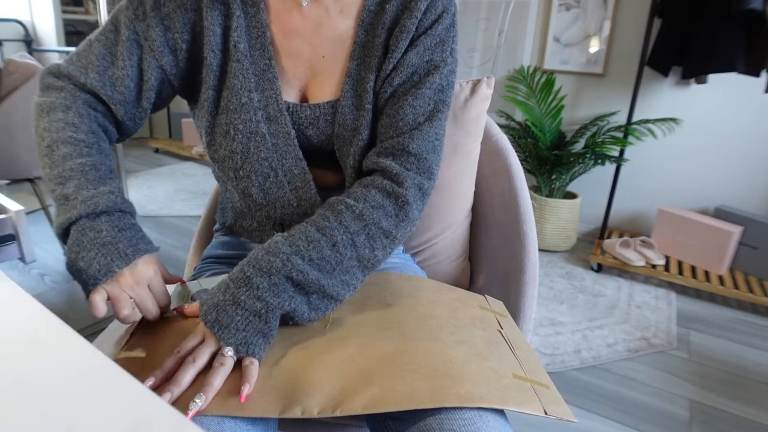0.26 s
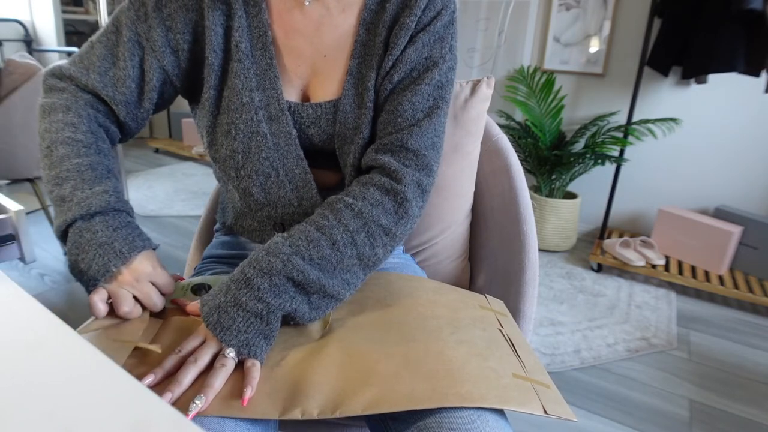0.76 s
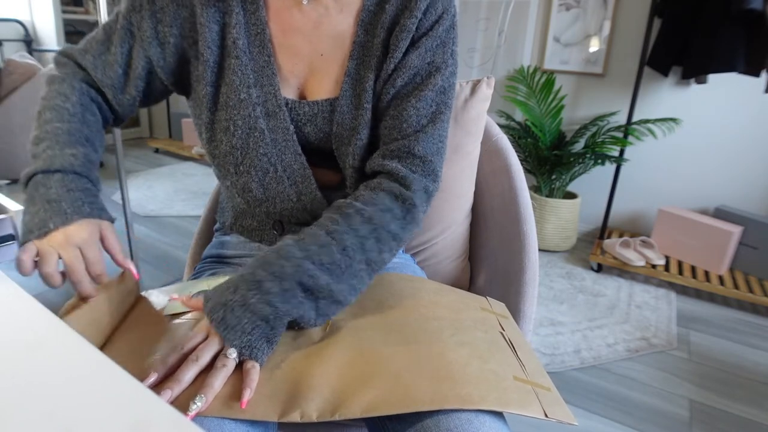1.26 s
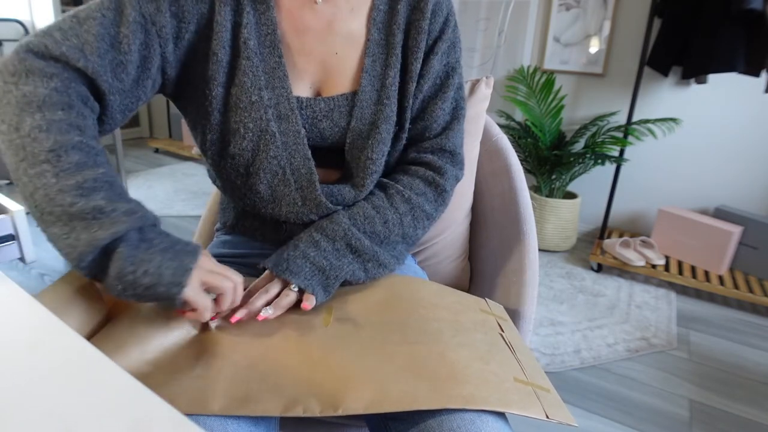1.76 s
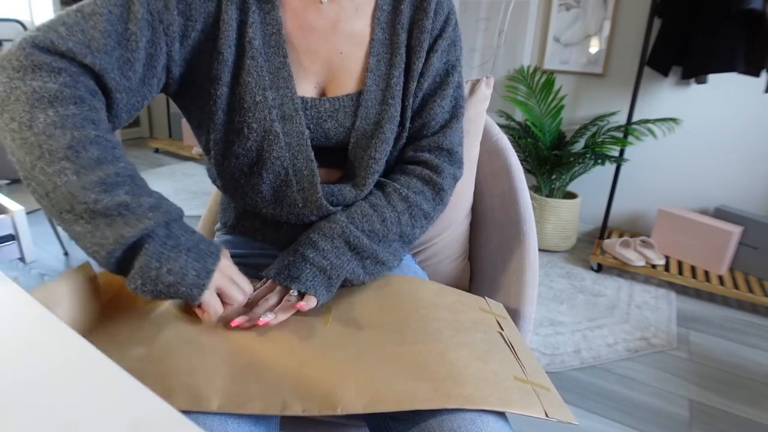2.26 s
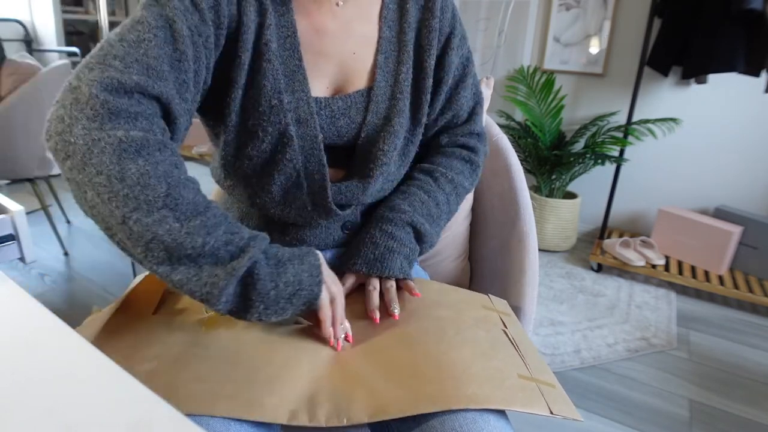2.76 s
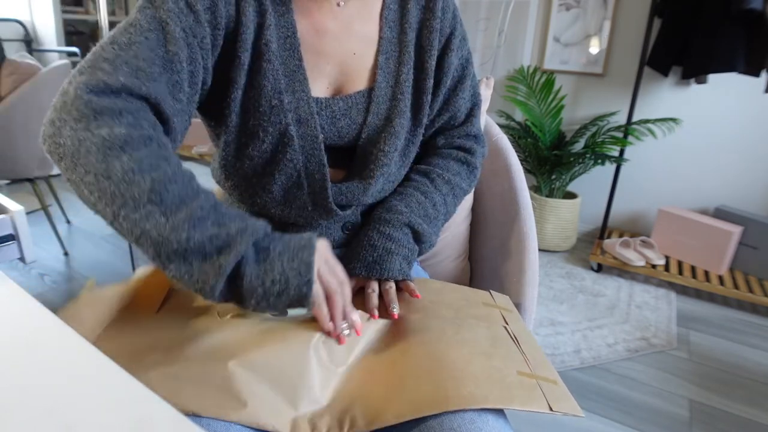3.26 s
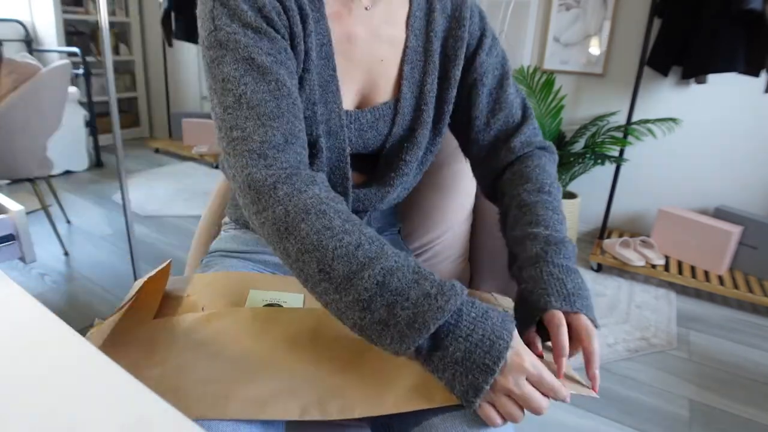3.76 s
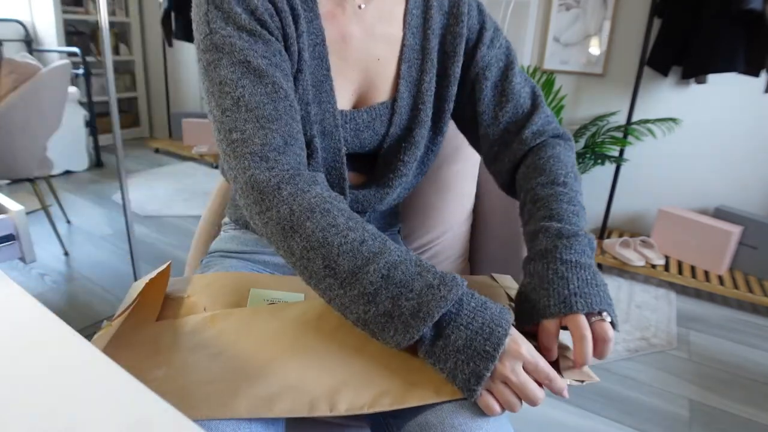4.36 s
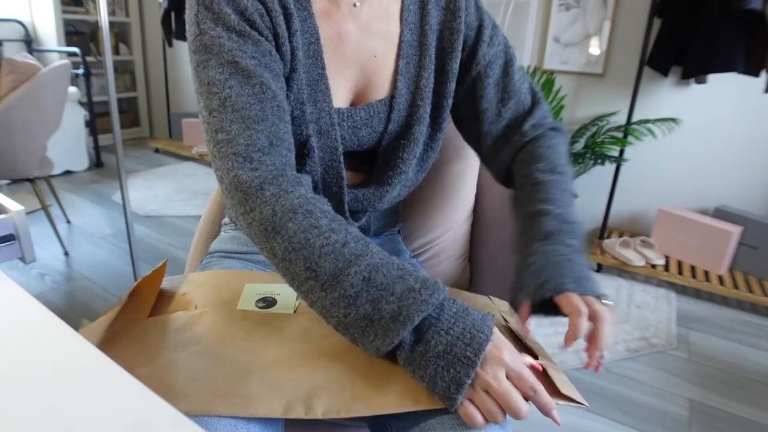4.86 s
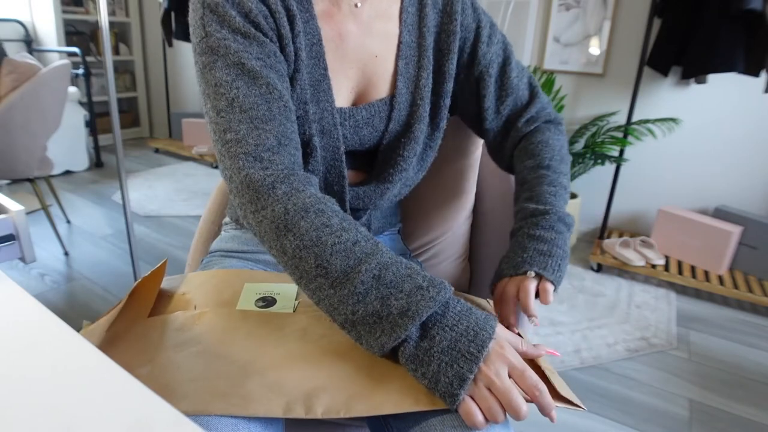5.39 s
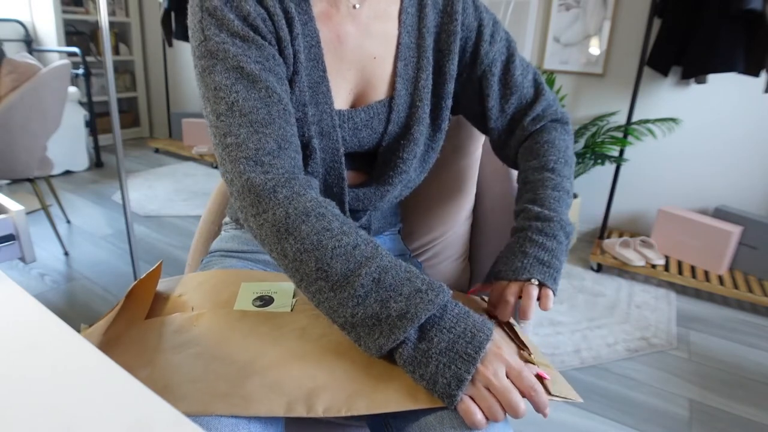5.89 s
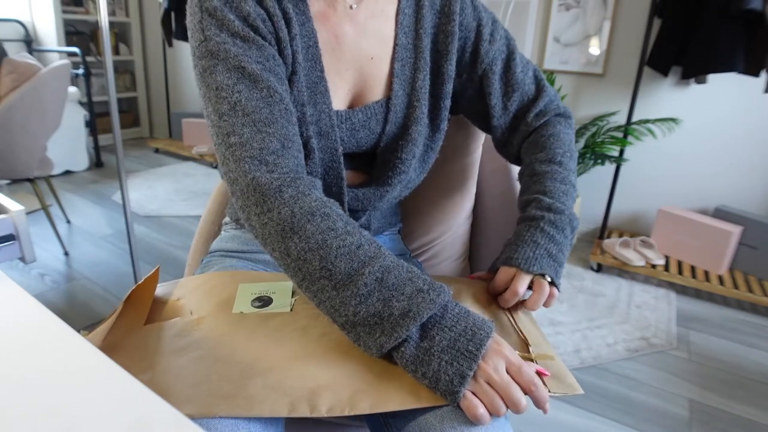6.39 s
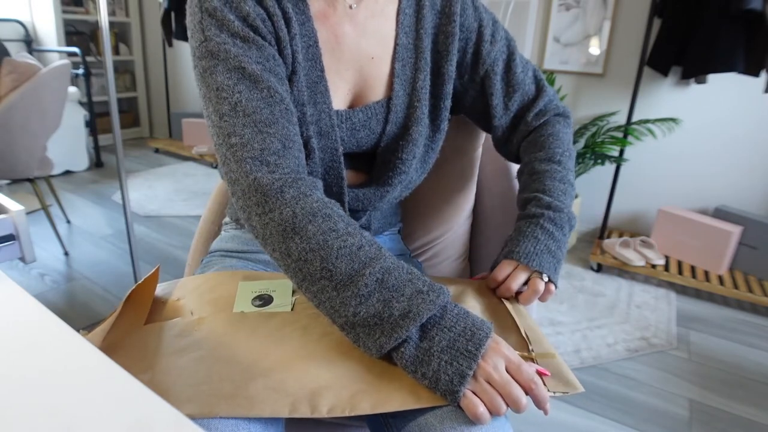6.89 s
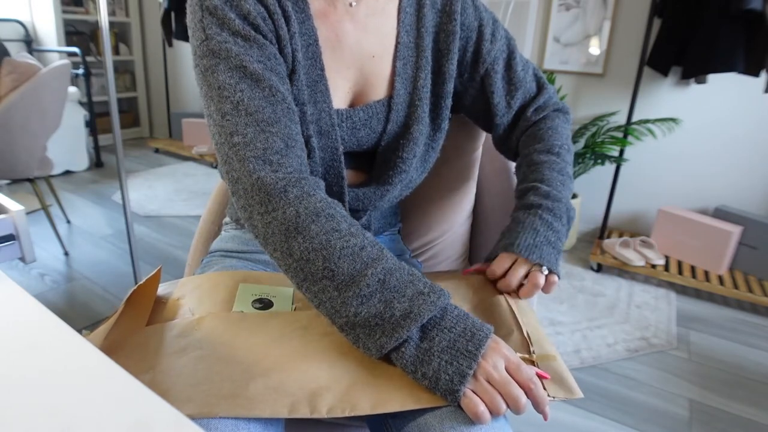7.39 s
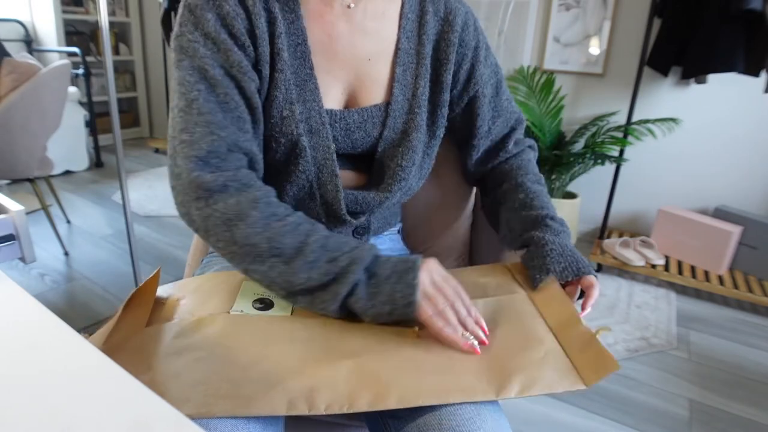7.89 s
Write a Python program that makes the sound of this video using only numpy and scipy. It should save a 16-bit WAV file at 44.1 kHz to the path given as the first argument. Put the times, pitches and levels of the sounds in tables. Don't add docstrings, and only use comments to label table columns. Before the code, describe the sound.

Close stereo sound of hands working a large, stiff kraft paper mailer in a living room. From 0 s light crinkles and small snaps grow, with soft low air puffs near 0.8 to 1.1 s and loud sharp creases and rips around 0.95 and 1.1 s. After a brief lull, scattered hard snaps continue from 1.3 s, becoming dense pinching crackle at 2 to 2.4 s and again until 3.6 s, with a soft puff at 3.2 s. At 3.7 s the room tail cuts abruptly. Quieter tab handling follows, with a strong rip at 4.6 s, then near quiet from 4.85 to 5.4 s. Seam crackles resume around 5.7 s, with a rip at 6.7 s. Busy, bright snapping peaks at 7.3 to 7.6 s, pauses, then crackles and rips from 7.85 s to the end. Short wall reflections and a faint steady hum remain underneath.

```python
import sys
import numpy as np
from scipy import signal
from scipy.fft import rfft, irfft, next_fast_len
from scipy.io import wavfile
from scipy.ndimage import uniform_filter1d, map_coordinates

SR = 44100
rng = np.random.default_rng(int(sys.argv[2]) if len(sys.argv) > 2 else 0)


def gain_from_db(level_db):
    decades = np.asarray(level_db, float) / 20
    return 10 ** decades


def generate_wav(sig):
    pcm = np.round(np.clip(np.atleast_2d(sig).T, -1, 1) * 32767).astype(np.int16)
    wavfile.write(sys.argv[1], SR, pcm)


N = 358753

# start_s, peak_db, low_part_db, high_part_db, flat_ring_hz
SNAPS = [(0.1088, -47, -21, 4, 5280), (0.1811, -21.5, -2, -10, 1720), (0.2537, -32, 2, -16, 1660),
         (0.2806, -36, -1, -14, 1420), (0.2988, -33, -5, -13, 3230), (0.3045, -29.5, 5, -3, 2220),
         (0.3092, -21, -14, -11, 3060), (0.3295, -23, -7, -9, 2050), (0.3481, -29, -12, -11, 3190),
         (0.3781, -25.5, 0, -10, 1880), (0.3844, -19.5, -26, -8, 1920), (0.4198, -25, -6, 6, 4800),
         (0.4744, -27, 3, -11, 970), (0.5288, -40, -14, -5, 2050), (0.5586, -44, -4, -10, 1790),
         (0.5785, -31, 6, -18, 1820), (0.5878, -25, -5, -22, 1680), (0.6654, -38, -11, -5, 2930),
         (0.6756, -36, 2, 2, 1700), (0.7366, -24, -4, -15, 1780), (0.7536, -21, -7, -9, 5000),
         (0.7807, -18.5, -16, 5.5, 4560), (0.8385, -14.5, 4.5, -6, 1260), (0.8833, -28, -21, -8, 1720),
         (0.9526, -11, -21, 0, 1750), (0.9581, -7, -15, -13, 2400), (1.0585, -21, 3, -2, 2000),
         (1.0679, -26, -9, -5, 2350), (1.0765, -23, -8, 13, 2200), (1.3033, -36.5, 13.5, -8, 1310),
         (1.3249, -24.5, -12, -11, 2330), (1.3741, -9.5, -9, -8, 4470), (1.4917, -25, -6, -17, 1780),
         (1.4985, -10.5, -19, -26, 1850), (1.5853, -10.5, -6, -7, 1320), (1.6185, -15, -6, -14, 1640),
         (1.7608, -23, -11, -24, 1760),
         (1.842, -21, -15, -3, 1540), (1.944, -42, -17, 1, 5900), (1.9532, -30, -2, -14, 1830),
               (1.9753, -33, -8, -13, 2070), (2.0335, -18, -29, -8, 3400), (2.0778, -13, -10, -14, 1440),
               (2.1183, -12.5, -19, -18, 3670), (2.1265, -7.5, -40, -22, 3420),
               (2.1471, -10, -38, -7, 4030), (2.1997, -9, -15, -22, 2550), (2.2263, -10.5, -19, -18, 3340),
               (2.244, -13, -25, -12, 3080), (2.313, -7.5, -8, -18, 1820), (2.5174, -22, -7, -9, 1760),
               (2.534, -7, -25, -11, 4200), (2.6322, -32, 9, -15, 2040), (2.6941, -16, -25, 9, 4700),
               (2.778, -35, 4.5, -5, 1630), (2.8233, -10, -27, -9, 4050), (2.8468, -20, -25, 10.5, 6700),
               (2.8607, -23, -15, 1, 4310), (2.8655, -30, -27, 6, 4610), (2.9099, -18.5, -15, -6, 2940),
               (2.9249, -20.5, -22, -21, 2240), (2.9648, -24.5, -20, -21, 6000),
               (2.9846, -9.5, -11, -3, 5500), (3.117, -22, 2.5, -9, 2660), (3.1445, -29, -6, -25, 1850),
               (3.166, -30, -24, 0, 4760), (3.175, -4.5, -23, -3, 4730), (3.2386, -17, 4.5, -16, 3940),
               (3.28, -12.5, -12, -6, 3580), (3.2996, -16, -19, -10, 1700), (3.307, -17, -1, -16, 2100),
               (3.3324, -14.5, -5, -32, 1700), (3.3885, -21, 2, -19, 1800), (3.393, -26, 1, -23, 1750),
         (3.4346, -23.5, 8, -8, 1380), (3.464, -12, -6, 5.5, 5570), (3.4804, -10.5, -7, 0, 2700),
             (3.4904, -17, -12, 7, 2500), (3.512, -12.5, -6, -6, 2650), (3.531, -26, 3, -11, 1920),
             (3.5555, -6.5, -4, -6, 4430), (3.725, -30, -3, -8, 1430), (3.8573, -39, -10, -8, 1980),
             (3.93, -45, -15, -11, 2480), (3.9796, -18.5, -19, -5, 3720), (4.0637, -49, -16, -8, 2170),
             (4.068, -16, -14, -28, 2620), (4.0805, -9.5, -30, -26, 4430), (4.1004, -14, -28, 2, 3400),
             (4.22, -29.5, -13, 3, 2990), (4.241, -16.5, -14, -7, 2000), (4.2776, -29, -7, -6, 1650),
             (4.309, -19, -13, -13, 4250), (4.419, -26.5, 2, -15, 880), (4.4309, -14, -7, -24, 2400),
             (4.4434, -20, -2, -17, 2400), (4.4567, -26, -17, -13, 1720), (4.5517, -15, -9, -18, 2400),
             (4.581, -8, -15, -2.5, 4080), (4.727, -21.5, -11, -8, 1670), (4.833, -26, -11, -32, 4350),
             (5.1357, -37, -27, -10, 4870), (5.2222, -36, -14, -8, 1740), (5.26, -30, -18, -13, 2370),
             (5.265, -36, -8, -8, 2260), (5.275, -21.5, -25, -11, 2100), (5.458, -20.5, -12, -0.5, 850),
             (5.5035, -25.5, -15, -16, 1920), (5.549, -39, -25, -16, 3400), (5.5894, -36, -12, -12, 3770),
             (5.5951, -17, -7, -4, 905),
         (5.663, -10.5, -17, -9.5, 4750), (5.6688, -29, -21, -12, 4740), (5.7347, -18, -13, -19, 3200),
              (5.7714, -20, -8, -19, 4030), (5.7891, -20.5, -18, -8, 5000), (5.8027, -31, 4, 3, 2820),
              (5.8394, -21, -14, -19, 3700), (5.88, -18, -7, 2.5, 1660), (5.9284, -17, -15, -15, 4300),
              (5.9388, -20, -24, -15, 2060), (5.9895, -26, 5, -18, 4130), (6.0138, -12.5, -35, -2.5, 2200),
              (6.031, -19, -7, -5, 4110), (6.037, -10.5, -15, -5, 1550), (6.0912, -19.5, -24, -15, 2900),
              (6.1206, -8, -20, -6, 2030), (6.128, -13.5, -19, -0.5, 2110), (6.156, -11, -9, -31, 1620),
              (6.2385, -28, 4, -16, 1390), (6.251, -13.5, -17, -16, 2230), (6.351, -32, -5, -7, 1850),
              (6.3859, -21.5, -3, -14, 2140), (6.4092, -27.5, -4, 0, 1080), (6.458, -24.5, -9, -23, 1650),
              (6.495, -23, 1, -21, 1400), (6.5352, -21, -3, -12, 1610), (6.5552, -22, -1, -7, 3770),
              (6.5926, -12.5, -7, 2, 2200), (6.653, -20, -10, -11, 1480), (6.6877, -15, -12, -25, 3200),
              (6.7269, -7, -10, -3, 4220), (6.8517, -26, -20, -22, 1770), (6.8602, -23.5, -16, -24, 1590),
              (6.891, -20.5, -2.5, -32, 2180), (6.906, -24.5, -12, -17, 2380), (6.937, -38, -19, -10, 2800),
              (6.9518, -28, -5, -22, 1650),
         (6.9586, -24.5, -14, -27, 1970), (6.9842, -19.5, -3.5, -25, 2520),
               (6.99, -15, -21, -15, 2740), (7.0127, -13.5, -4, -9, 2750), (7.0341, -16.5, -15, -9, 1680),
               (7.0432, -15, -11, -9, 3230), (7.0758, -19.5, 1, -11, 2160), (7.0894, -8, -18, -3.5, 2900),
               (7.1296, -26, -12, -7, 2260), (7.1366, -11.5, -27, -7, 2630), (7.1578, -21, -28, -18, 3480),
               (7.2355, -39, 1, -13, 1830), (7.2576, -48, -6, -25, 1300), (7.2801, -45, -4, -13, 1540),
               (7.3125, -15.5, 4, -11, 2300), (7.3192, -13, -6, -15, 1950), (7.3346, -6.5, -7.5, -30, 3400),
               (7.3528, -22, -2, -14, 2300), (7.4107, -17, -20, -20, 4480), (7.4257, -20, 4.5, -23, 1350),
               (7.446, -10.5, -12, -6, 3420), (7.4833, -10.5, -2, -30, 1730), (7.5146, -28, -12, 12, 3620),
               (7.5223, -17, -17, -9, 1540), (7.5413, -8, -11, -6, 3460), (7.558, -3.5, -17, -19, 1570),
               (7.5675, -8, -13, -25, 1870), (7.8613, -25, 0.5, -4, 1600), (7.8701, -18.5, -6, -2, 6200),
               (7.9483, -9, -38, -8, 3870), (7.975, -26, -21, -7, 4520), (8.001, -18, -26, -10, 2370),
               (8.0146, -19.5, -11, -13, 1330), (8.0372, -11, -4, -21, 2040), (8.0556, -19, 9.5, -12, 2220),
               (8.063, -8.5, -15, -18, 1920), (8.0883, -16.5, -20, 5, 4340),
         (1.1057, -7, -15, -1, 3140),
    (4.5927, -11, -17, -7, 4110),
    (6.6969, -14, -3.5, -22, 2300),
    (7.5767, -7, -7, -7, 2300),
    (8.0701, -7, -11, -4, 2600),
]
# start_s, peak_db, low_part_db, high_part_db, length_ms
RIPS = [(0.0004, -24.5, -13, 0, 17), (0.9519, -12.5, -8.5, -6.5, 26), (1.099, -13, -3, -5, 20),
        (2.2408, -7.5, -48, -16, 42), (3.1722, -17.5, -6, -38, 49), (3.5538, -11, -18, -13, 15),
        (3.701, -26, -1, -6, 3), (4.549, -18.5, 3.5, -39, 31), (4.58, -15, -17, -5, 60),
        (5.22, -33.5, -21, -15, 6), (6.721, -18.5, -10, 2, 24), (7.5569, -10.5, -26, -56, 45),
        (7.601, -11.5, -24, -19, 50), (8.0606, -10, -30, -25, 11)]
# start_s, hold_s, crinkle_db, boom_db (over the
# crinkle), brightness_db
SPELLS = [(-0.004, 0.23, -49.5, -5, 20), (0.292, 0.15, -39.5, -9, 10.5),
          (0.47, 0.23, -41.5, -29, 8), (0.74, 0.16, -38, -11.5, 10.5),
          (0.959, 0.064, -27, -10.5, 12), (1.072, 0.044, -24.5, -6.5, 14.5),
          (1.206, 0.19, -41, -5, 10), (1.374, 0.062, -38, -26, 15.5), (1.476, 0.37, -39, -30, 3),
          (1.596, 0.071, -34.5, -13, 15.5), (1.716, 0.12, -33.5, -20, 3.5),
          (1.995, 0.057, -34.5, -35, 14), (2.115, 0.14, -44.5, -12, 27),
          (2.236, 0.079, -27.5, -9.5, 14), (2.363, 0.025, -23, -17.5, 3),
          (2.448, 0.06, -28.5, -15.5, 1), (2.532, 0.019, -35.5, -5, 17.5),
          (2.606, 0.17, -42, -10, 11), (2.69, 0.26, -46, -25, 16.5), (3, 0.065, -38.5, -16, -8),
          (3.187, 0.056, -24, -12.5, 12), (3.294, 0.023, -27, -8, -10),
          (3.396, 0.038, -23.5, -10, -3), (3.487, 0.085, -26.5, -7.5, 8.5),
          (3.534, 0.12, -34.5, -5.5, 11.5),
          (3.73, 0.37, -56, -15, 17.5), (3.977, 0.19, -40, -11, 12.6),
                  (4.09, 0.05, -32.5, -22, 15.4), (4.22, 0.14, -40.5, -15, 10),
                  (4.428, 0.14, -44.5, -9, 11), (4.556, 0.087, -23.5, -10, 7.6),
                  (4.84, 0.022, -56, -3, 8.6), (4.95, 0.087, -55.5, -10, 10.6),
                  (5.12, 0.049, -70, -11, 26.5), (5.228, 0.11, -48, -4.5, 13.4),
                  (5.41, 0.066, -56.5, -10, 18), (5.47, 0.18, -44.5, -9, 13.6),
                  (5.67, 0.061, -49, -4.5, 26), (5.89, 0.35, -37, -15, 11.6), (6.13, 0.02, -27.5, -17, 8.3),
                  (6.23, 0.063, -56.5, 3, 12), (6.29, 0.062, -42.5, -8.5, 12.7),
                  (6.42, 0.18, -39, -10, 9.6), (6.599, 0.16, -38.5, -3.5, 15.3),
                  (6.82, 0.14, -45.5, -10.5, 0.33), (7.02, 0.14, -32, -13.5, 1.7),
                  (7.276, 0.068, -35.5, -7, 7.3), (7.32, 0.096, -34.5, -15, 8), (7.45, 0.13, -29, -16, 8.7),
                  (7.551, 0.082, -24, -12.5, 7.4), (7.75, 0.14, -46.5, -17, 9.4),
                  (7.871, 0.073, -40, -3.5, 15), (7.955, 0.071, -28.5, -16.5, 13.2),
                  (8.05, .1, -27, -10.5, 17.2)]
# start_s, peak_db, pitch_hz
THUDS = [
    (0.838, -34.5, 330),
    (0.951, -33.5, 323),
    (1.093, -35, 144),
    (3.173, -37, 507),
    (5.985, -41.5, 290),
    (6.591, -39, 474),
]
# time_s, left_over_right_db
LEAN = [(0.0, 2.5), (0.45, 1.5), (5.96, -3), (8.13, -1.5)]
# freq_hz, level_db (per Hz)
PAPER = [(150, -19), (550, -7), (900, 2), (1900, 7), (4200, -3), (8000, -15.5), (14000, -37), (16500, -54)]
# freq_hz, level_db (per Hz)
BOOM = [(70, -29), (130, -28.5), (210, -7.5), (360, -4.5), (460, 0), (600, -12.5), (1300, -27.5)]
# delay_ms, level_db
WALLS = [(8, -12), (11, -14), (18, -14), (20.2, -14)]
# freq_hz, t60_s
ROOM = [(200, 0.43), (1500, 0.34), (4000, 0.36), (10000, 0.34)]
# freq_hz, likeness (0 to 1)
ALIKE = [(200, 0.99), (1000, 0.8), (4000, 0.65), (10000, 0.15)]
# freq_hz, level_db (per Hz)
AIR = [(82, -20), (128, 0), (175, -11), (430, -19), (700, -11), (1300, -17), (2070, -5), (15500, -29)]

SCENE_CHANGE_S = 3.705
GRIP_S, RELEASE_DB_PER_S = 0.017, 268
REST_DB = -61
PATCHY_DB = 3
RING_DB, RING_CYCLES, RING_ROOM_DB = -2, 18, -4
SNAP_ROOM_DB = -0.5
SCATTER_DB = -6


def cracks(table, ms, hz, after_db):
    s, db, low_db, high_db = np.transpose(table)[:4, :, None]
    t = np.arange(3000 if ms.max() > 6 else 1200) / SR
    fade = gain_from_db(-10 * t * 1000 / np.clip(ms, 0.4, 40))
    fade *= 1 + 0.7 * np.exp(-t / 0.0004)
    fade *= np.where(ms > 6, 1 - np.exp(-t / 0.002), 1)
    burst = rng.standard_normal((len(s), len(t))) * fade
    click = (t == 0) * 1.0
    toward = around = 0
    bands = [(600, 1500, low_db - 2, -1), (1500, 5000, 0, 1), (5000, 10500, high_db - 2, -1)]
    for lo_hz, hi_hz, part_db, sign in bands:
        part, even = band(burst, lo_hz, hi_hz), band(click, lo_hz, hi_hz)
        peak = np.abs(signal.hilbert(part[:, :512])).max(axis=1, keepdims=True)
        part = sign * gain_from_db(db + part_db) * part / peak
        toward = toward + part
        strength = np.linalg.norm(part, axis=1, keepdims=True)
        around = around + sign * even / np.linalg.norm(even) * strength
    ring = gain_from_db(db + RING_DB - 60 * t * hz / RING_CYCLES) * np.sin(2 * np.pi * hz * t)
    both = np.array([toward + ring, around + gain_from_db(RING_ROOM_DB) * ring])
    toward, around = band(both, 787, 20000)
    return placed(s, toward), placed(s, gain_from_db(after_db) * around)


def crinkle():
    level_db, boom_db, bright_db = handling()
    chance = rng.random(N)
    size = np.clip(rng.exponential(1, N), 0, 3)
    clumps = gain_from_db(2.5 * wobble(40) + 2 * wobble(150))
    buckles = (chance < 1400 / SR) * gain_from_db(2.04 * size) * np.sign(rng.standard_normal(N))
    rub = unit(buckles) + 0.35 * rng.standard_normal(N)
    paper = unit(coloured(patchy(clumps * rub), PAPER))
    treble = coloured(paper, [(2000, -23.0), (5000, -2.5), (9000, -0.5), (16000, 14)])
    paper = paper + (gain_from_db(bright_db) - 1) * treble
    boom = unit(coloured(clumps * rng.standard_normal(N), BOOM))
    return gain_from_db(level_db - 4) * paper + gain_from_db(boom_db - 6.0) * boom


def handling():
    spells = np.array(SPELLS)
    s, hold, db, boom_db, bright_db = np.transpose(spells)[..., None]
    t = np.arange(0, N / SR + 0.01, 0.002)
    swell = np.clip((t - s) / GRIP_S + 1, 1e-3, 1) ** 2
    grip = swell * gain_from_db(db - RELEASE_DB_PER_S * np.clip(t - s - hold, 0, None))
    grip += gain_from_db(REST_DB) / len(s)
    level = np.linalg.norm(grip, axis=0)
    boom = np.linalg.norm(grip * gain_from_db(boom_db), axis=0)
    bright = np.linalg.norm(grip * gain_from_db(bright_db), axis=0)
    levels_db = 20 * np.log10([level, boom, bright / level])
    return curves([np.transpose([t, *levels_db])])


def patchy(x):
    z = signal.stft(x, nperseg=256)[2]
    field = uniform_filter1d(rng.standard_normal(z.shape), size=5, axis=0)
    field = uniform_filter1d(field, size=6, axis=1)
    z = z * gain_from_db(PATCHY_DB * np.clip(unit(field), -2, 2))
    return signal.istft(z, nperseg=256)[1][:N]


def thuds():
    s, db, hz = np.transpose(THUDS)[..., None]
    turns = hz * np.arange(4096) / SR
    swell = 1 - np.exp(-turns / 1.2)
    return placed(s, gain_from_db(db - 8.0 * turns) * swell * np.sin(2 * np.pi * turns))


def room(x):
    wet, hop, cut = np.zeros((2, N + 2 * SR)), SR // 5, round(SCENE_CHANGE_S * SR)
    for first, last in [(0, cut), (cut, N)]:
        for start in range(first, last, hop):
            tail = room_tail()
            part = signal.fftconvolve(x[None, start:min(start + hop, last)], tail, axes=1)
            wet[:, start:start + part.shape[1]] += part
        wet[:, last:] = 0
    return wet[:, :N]


def room_tail():
    hz, t, z = diffuse(SR // 2)
    decay = gain_from_db(-60 * t / along(ROOM, hz)[:, None])
    tail = signal.istft(z * (hz > 0)[:, None] * decay, SR, nperseg=256)[1]
    ms = np.arange(tail.shape[1]) * 1000 / SR
    tail *= gain_from_db(-1.5) * np.clip(ms / 4, 0, 1) / np.linalg.norm(tail[0])
    echoes = 0
    for at, db in WALLS:
        late = ms - at - rng.normal(0, 0.3)
        echoes = echoes + gain_from_db(db) * np.exp(-(late / 1.1) ** 2)
    steady = tail / np.sqrt(uniform_filter1d(tail[0] ** 2, 400) + 1e-12)
    return tail + steady * echoes * 0.07


def air():
    hiss = signal.istft(diffuse(N)[2], SR, nperseg=256)[1][:, :N]
    return gain_from_db(-54.0 + 0.13 * wobble(1.7)) * unit(coloured(hiss, AIR))


def diffuse(length):
    hz, t, (a, b) = signal.stft(rng.standard_normal((2, length)), SR, nperseg=256)
    turn = np.arccos(np.clip(along(ALIKE, hz), -1, 1))[:, None] / 2
    mid, side = np.cos(turn) * a, np.sin(turn) * b
    return hz, t, np.array([mid + side, mid - side])


def unit(x):
    return x / np.sqrt(np.mean(x ** 2) + 1e-20)


def along(points, hz):
    f, v = np.transpose(points)
    return np.interp(np.log(hz + 1), np.log(f + 1), v)


def curves(tables):
    s, *cols = np.transpose(np.vstack(tables))
    return [np.interp(np.arange(N) / SR, s, c) for c in cols]


def wobble(rate):
    return map_coordinates(rng.standard_normal(N // 100), [np.arange(N) * rate / SR])


def coloured(x, spectrum):
    m = next_fast_len(x.shape[-1] + 8192)
    gain = gain_from_db(along(spectrum, np.fft.rfftfreq(m, 1 / SR)))
    return irfft(rfft(x, m) * gain, m)[..., :x.shape[-1]]


def band(x, lo_hz, hi_hz):
    sos = signal.butter(N=2, Wn=[lo_hz, min(hi_hz, 20000)], btype="band", fs=SR, output="sos")
    return signal.sosfilt(sos, x)


def placed(s, rows):
    at = np.round(s * SR).astype(int) + np.arange(rows.shape[1])
    return np.bincount(at.ravel(), rows.ravel(), N + SR)[:N]


def scene():
    pan_db = curves([LEAN])[0]
    creases = np.array(SNAPS)
    snap_ms = rng.uniform(1.1, 2.2, (len(creases), 1))
    snaps, spread = cracks(creases, snap_ms, creases[:, 4:], SNAP_ROOM_DB)
    rips = cracks(RIPS, np.array(RIPS)[:, 4:], 0, 0)[0]
    sheet = crinkle() + rips + gain_from_db(16.5) * band(thuds(), 97, 1300)
    near = (sheet + snaps) * gain_from_db(np.array([pan_db, -pan_db]) * 0.69)
    scatter = wobble(45) * band(sheet + snaps, 7200, 27000)
    near += gain_from_db(SCATTER_DB) * scatter * [[1], [-1]]
    return near + room(gain_from_db(-3.0) * sheet + spread) + air()


def roll_off(x):
    return signal.sosfilt(signal.butter(12, 16520, fs=SR, output="sos"), x)


def record(dry):
    heard = coloured(dry, [(30, -12), (90, -1), (11000, 0.0), (15300, -1.5), (16200, -13), (16500, -70)])
    heard = heard / (1 + np.abs(heard / 0.9) ** 4) ** 0.25
    return roll_off(heard)


dry = scene()
out = record(dry)
generate_wav(out)
```